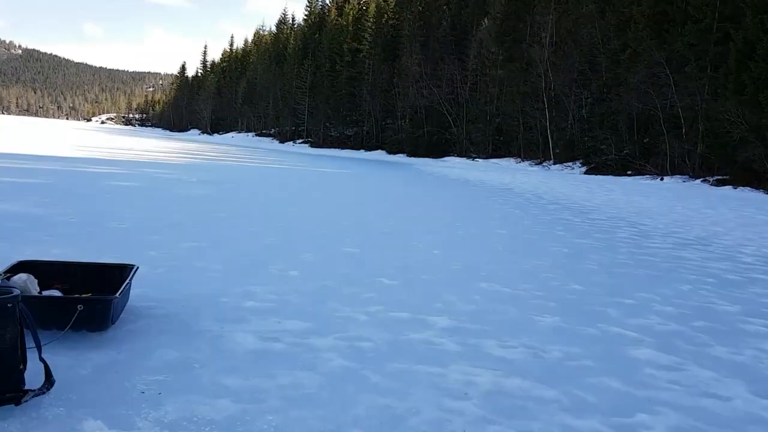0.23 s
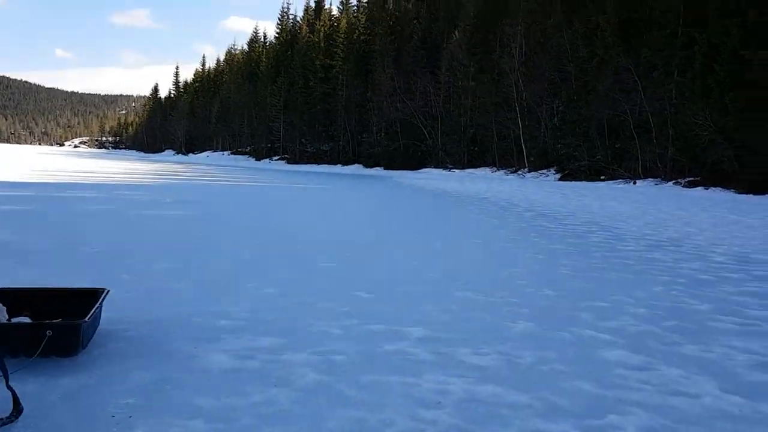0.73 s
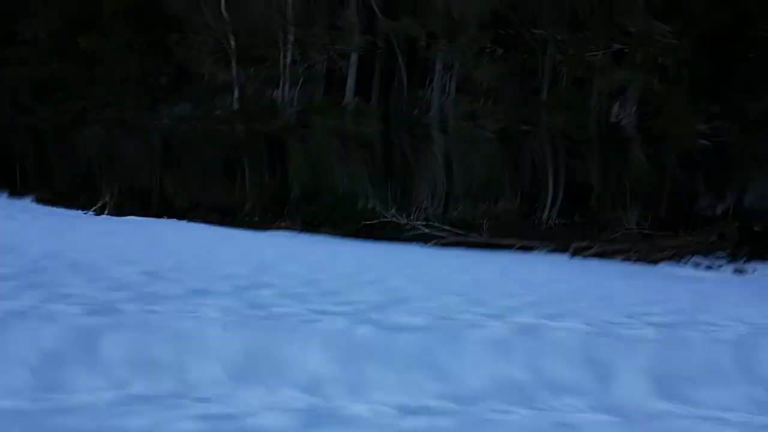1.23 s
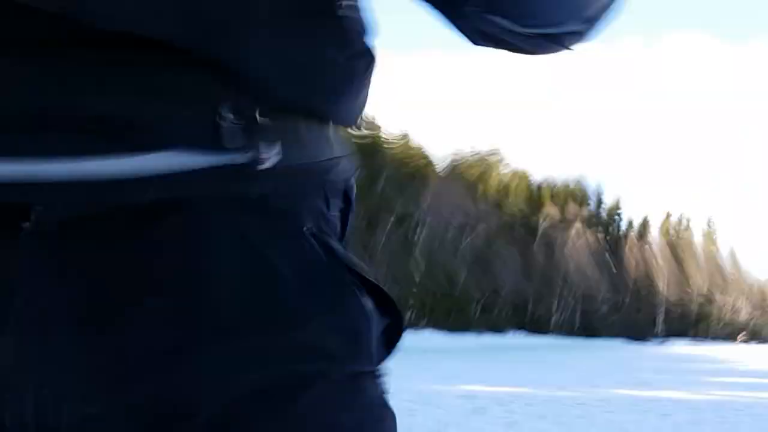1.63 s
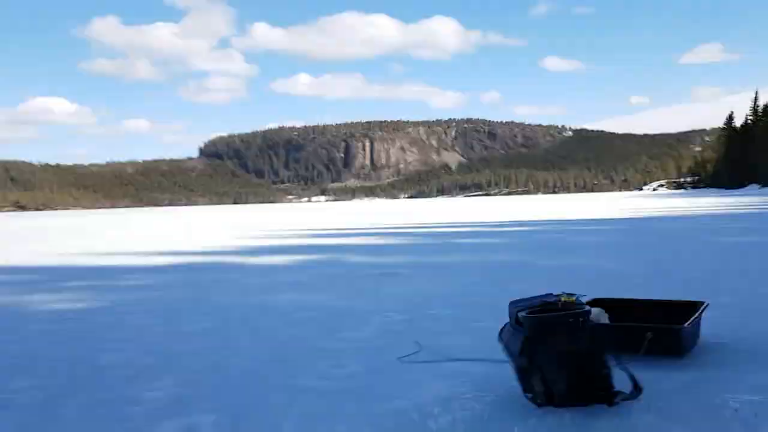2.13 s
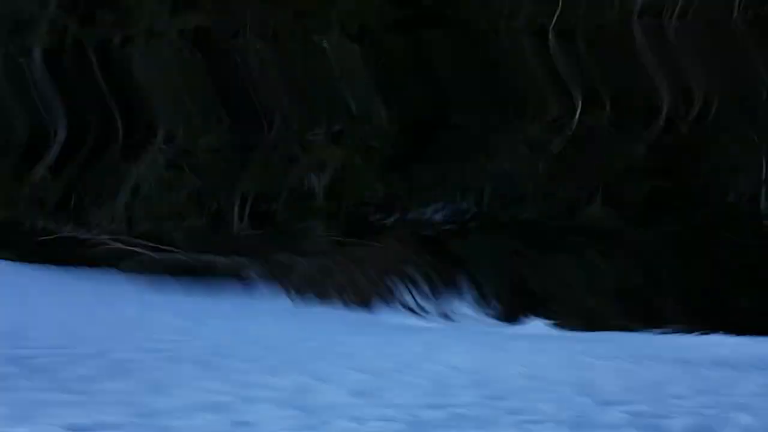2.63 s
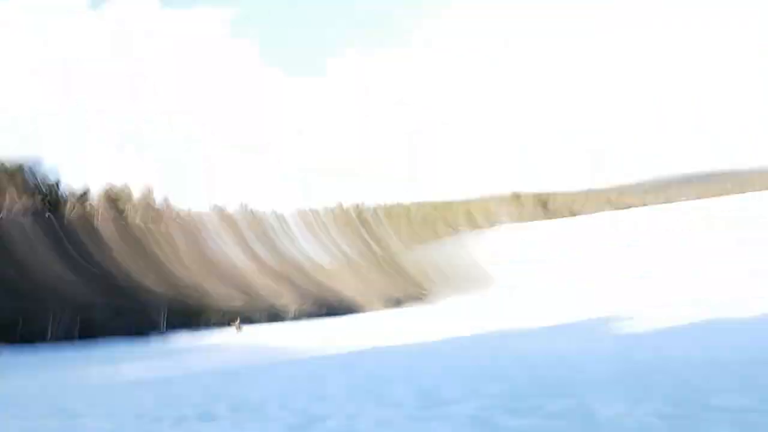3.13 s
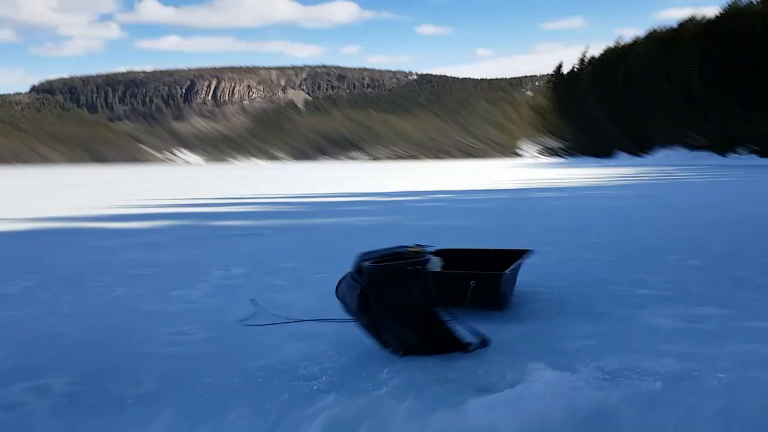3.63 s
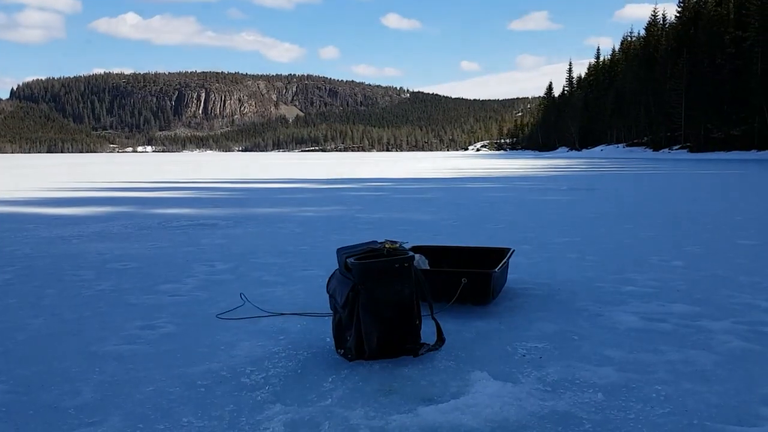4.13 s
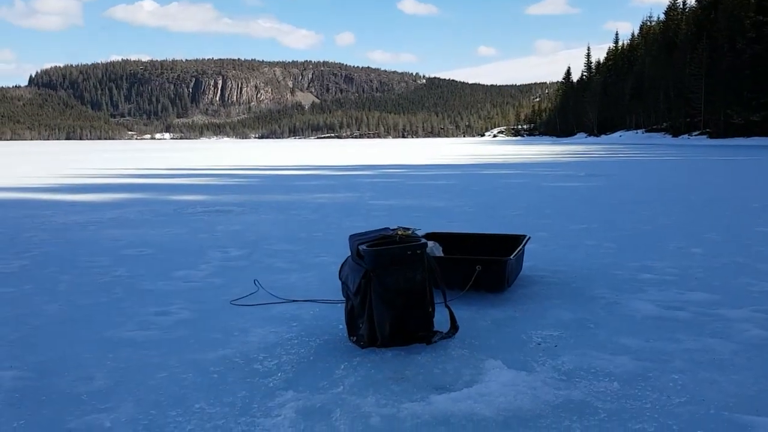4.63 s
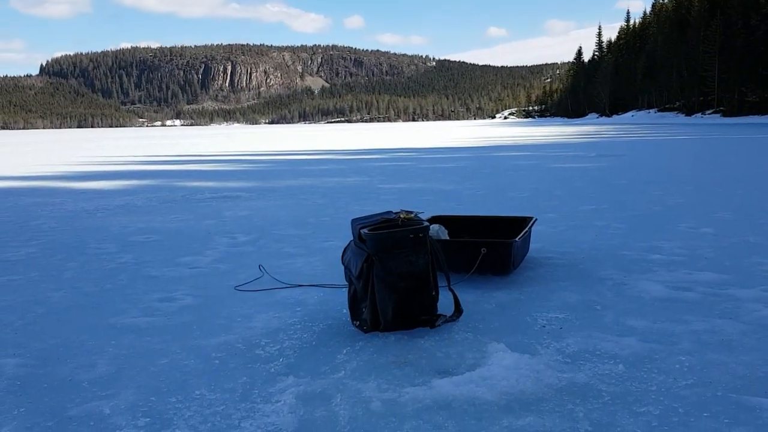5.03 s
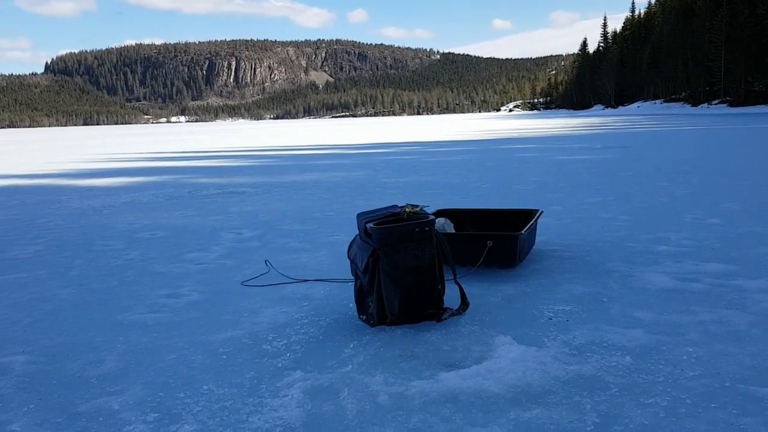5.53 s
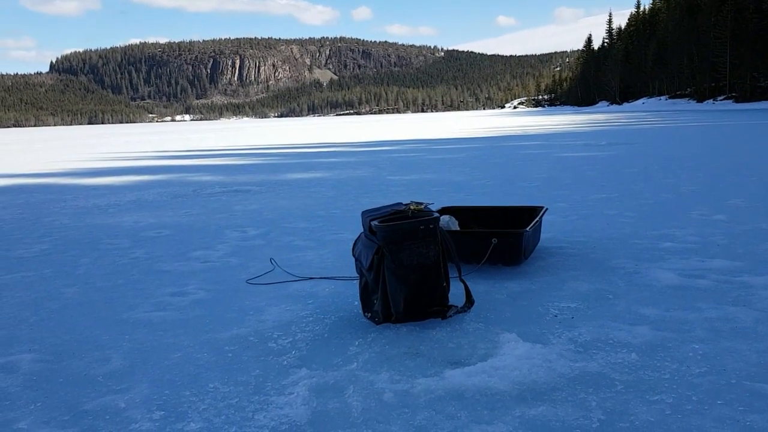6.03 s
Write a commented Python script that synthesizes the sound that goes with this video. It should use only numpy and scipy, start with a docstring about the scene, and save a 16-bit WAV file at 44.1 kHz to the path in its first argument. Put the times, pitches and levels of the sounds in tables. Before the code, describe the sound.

A hand auger bores into lake ice, heard very close from a microphone riding on it. Two quick catches and creaking, snapping boot crunches come first, then a light lull, jolting chatter with short squeals, and a steady rough grind with ticking ice chips. The grind stops abruptly, leaving crunching steps that thin out and return, over soft clothing rustle and a quiet, open, echoless lake.

```python
"""A hand auger turns into lake ice, with the camera and its two microphone ports riding on it.
Its blades catch, chatter and squeal, then grind: random breaks excite resonances and spectra.
Chips, as short noise bursts, tick close to the right port, powder hisses and the steel shaft rings faintly.
Near by, boots creak, snap and crunch on crusted snow before and after the grinding, made of pitched grains
and noise. Winter clothes crinkle softly, and filtered noise gives the hush of the still, open lake."""
import sys
import numpy as np
from scipy import signal
from scipy.fft import rfft, irfft, next_fast_len
from scipy.io import wavfile
from scipy.ndimage import uniform_filter1d, map_coordinates

SR = 44100
rng = np.random.default_rng(int(sys.argv[2]) if len(sys.argv) > 2 else 0)


def transcribe(u):
    """Save the signal u as a 16-bit wav file named by the first command-line argument.

    u: samples, shape (n,) or (channels, n), limited to [-1, 1]; the rate is SR.
    q: integer samples, one column per channel.
    """
    v = np.clip(np.atleast_2d(u).T, -1, 1)
    q = np.round(v * 32767).astype(np.int16)
    wavfile.write(sys.argv[1], SR, q)


N = 276948
SIZE = next_fast_len(N + SR, real=True)  # room for responses to ring out
FREQ = np.fft.rfftfreq(SIZE, 1 / SR)
TIME = np.arange(N) / SR

# Event levels are relative, ahead of each layer's own trim; spectra are relative too.
# Hush of the open lake. Each row: frequency in Hz, density in dB per Hz.
AIR_SPECTRUM = [(25, -22), (100, -8), (200, -12), (320, -0.5), (520, -16), (1300, -18.5), (3400, -35),
                (8000, -41), (16000, -31)]
# Spread of the hush over the two ports. Each row: frequency in Hz, side minus mid in dB.
AIR_WIDTH = [(60, -10), (300, -5), (3000, 4)]

# How much the winter clothes shift. Each row: time in seconds, level in dB.
CLOTHES = [(0, -52.5), (0.65, -48.5), (1.0, -45.5), (3.8, -49.5), (4.4, -48.5), (4.75, -56), (5.2, -64),
           (5.7, -52.5), (6.28, -48.5)]

# A boot twists on packed snow. Each row: start in seconds, length in seconds, level in dB.
TWISTS = [(0.298, 0.025, -37), (0.36, 0.036, -35), (0.405, 0.075, -31), (0.543, 0.0068, -39),
          (0.59, 0.02, -44.5)]
# A heel or sole presses into looser snow. Each row: start in seconds, length in seconds,
# crunch in dB, rustle in dB.
STEPS = [(3.993, 0.037, -40, -41), (4.087, 0.034, -38.5, -43), (4.207, 0.041, -40, -39.5),
         (4.3, 0.19, -58, -55), (4.505, 0.014, -44.5, -49), (5.03, 0.044, -61.5, -68),
         (5.33, 0.05, -54.5, -65), (5.428, 0.075, -48, -56), (5.62, 0.03, -49.5, -58),
         (5.823, 0.071, -40.5, -39.5), (5.928, 0.13, -36, -41), (6.198, 0.016, -34.5, -44),
         (6.265, 0.03, -34, -38)]
# Loudest snaps of the crust under a boot. Each row: start in seconds, pop level in dB, pitch in Hz,
# crispness (crack minus pop) in dB.
SNAPS = [(0.448, -8.5, 1350, -42), (0.455, -11.5, 1500, -35), (0.466, -17, 1270, -31),
         (0.525, -19, 1220, -25), (0.546, -24, 1090, -12.5), (0.609, -27, 1570, -20),
         (0.915, -24, 2000, -15.5), (3.824, -13, 1720, -25), (3.841, -30.5, 960, -12),
         (4.112, -28, 1170, -17), (4.207, -24.5, 1350, -13), (4.237, -24.5, 920, -14),
         (4.298, -29, 2700, -8), (4.331, -26.5, 1530, -28), (4.356, -23.5, 2540, -10.5),
         (4.417, -22, 2400, -13), (4.516, -17, 2970, -40), (4.897, -37.5, 1150, -20),
         (4.945, -34.5, 3050, -16.5), (5.031, -29.5, 3180, -14.5), (5.069, -44.5, 1270, -6),
         (5.326, -37.5, 2140, -11.5), (5.427, -30, 1190, -15.5), (5.481, -31, 920, -21),
         (5.626, -36, 784, -34), (5.823, -23.5, 1380, -21), (5.854, -17.5, 2110, -16),
         (5.881, -11.5, 3370, -19), (5.937, -32.5, 886, 5.5), (6.101, -28, 2300, -22),
         (6.169, -25, 870, -32), (6.204, -18.5, 1980, -14)]
# Fine crunch of packed snow. Each row: frequency in Hz, density in dB per Hz.
PACKED_SPECTRUM = [(47, -64), (80, -25.5), (431, -11), (629, -27), (1200, -11), (2040, -15), (3620, -26.5),
                   (5400, -26), (8990, -33), (14600, -38.5), (16000, -44)]
# Crunch of looser snow. Each row: frequency in Hz, density in dB per Hz.
CRUNCH_SPECTRUM = [(40, -14), (150, -6), (350, 6.5), (1000, -5.5), (2400, -14), (4000, -8), (9000, -18.5)]
# Rustle of powder and clothing, also the crack of the crust. Each row: frequency in Hz, density in dB per Hz.
RUSTLE_SPECTRUM = [(800, -23), (2400, 7), (3500, 1.5), (5700, -1.5), (8500, -5.5), (16000, -18)]
# What the air path passes on from a single break. Each row: frequency in Hz, gain in dB.
AIR_PATH = [(40, -33), (300, -9), (700, 1), (5000, -4), (9000, -8), (16000, -18.5)]
# Spread of the twists and pops over the ports. Each row: frequency in Hz, side minus mid in dB.
NEAR_WIDTH = [(60, -5), (150, -4.5), (380, -13), (950, -23), (2380, -6.5), (5980, -3), (15000, 8)]
# Spread of the steps, cracks and clothes over the ports. Each row: frequency in Hz, side minus mid in dB.
STEP_WIDTH = [(60, -4), (150, -12), (380, -14), (950, -5), (2380, -3.5), (5980, 2.5), (15000, -2)]
# Balance of boots and clothes. Each row: frequency in Hz, left minus right in dB.
STEP_LEAN = [(500, 0.5), (3500, 1.2), (7000, 6)]

# Largest flying chips of ice. Each row: time in seconds, peak in dB.
CHIPS = [(0.6564, -25), (0.9825, -23), (1.013, -20), (1.115, -16), (1.2365, -17), (1.2745, -14),
         (1.541, -18), (2.2862, -11.5), (2.4089, -17.5), (2.5282, -12), (2.5681, -10.5), (2.6574, -9.5),
         (2.6853, -12.5), (2.8145, -18.5), (2.9158, -13), (2.9417, -13.5), (3.2884, -13), (3.3687, -13.5),
         (3.6167, -11.5), (3.709, -20), (4.5715, -23), (5.3527, -27.5), (5.4819, -17.5), (5.5019, -25)]
# Tick of a chip near the port. Each row: frequency in Hz, density in dB per Hz.
TICK_SPECTRUM = [(1000, -25), (2500, -6.5), (4000, 6.5), (8000, 4), (16000, 0)]
# Hiss of the ice powder. Each row: frequency in Hz, density in dB per Hz.
SPRAY_SPECTRUM = [(1000, -25), (3500, 10), (8000, 1), (12000, -9), (16000, -4)]
# A blade squeals over the ice. Each row: start in seconds, length in seconds, start pitch in Hz,
# end pitch in Hz, level in dB.
SQUEALS = [(1.23, 0.027, 1750, 1500, -23.5), (1.268, 0.036, 1370, 1060, -40),
           (1.34, 0.025, 3330, 2290, -28), (1.643, 0.029, 951, 880, -15), (1.857, 0.013, 1980, 1770, -21.5)]

# The blades catch in the ice. Each row: start in seconds, length in seconds, chatter in dB,
# shaving in dB, rumble in dB.
BITES = [(0.011, 0.022, -17.5, -27, -28), (0.039, 0.025, -25, -31.5, -28.5), (1.05, 0.055, -21, -35, -31),
         (1.134, 0.14, -21, -31, -31), (1.184, 0.13, -22.5, -30, -23.5), (1.34, 0.019, -21.5, -26, -31),
         (1.587, 0.096, -23.5, -36.5, -24.5), (1.697, 0.022, -23, -39.5, -28),
         (1.824, 0.0063, -26.5, -41, -32), (1.841, 0.095, -34, -31.5, -25),
         (1.902, 0.017, -20.5, -26.5, -30)]
# The blades slide without catching. Each row: start in seconds, length in seconds, rumble in dB, shaving in dB.
SLIDES = [(0.68, 0.13, -42.5, -56), (0.98, 0.06, -37.5, -45), (1.37, 0.19, -30.5, -39.5),
          (1.72, 0.1, -27.5, -62), (1.93, 0.066, -28, -45), (4.51, 0.17, -51.5, -59),
          (4.72, 0.29, -60.5, -65)]
# Pressure on the seated blades. Each row: time in seconds, level in dB.
GRIND = [(2.06, -42), (2.088, -27), (2.27, -19), (2.826, -18), (3.004, -20.5), (3.556, -18), (3.66, -21),
         (3.706, -25.5), (3.74, -57)]
# Chunks of ice break under a blade. Each row: time in seconds, peak in dB.
JOLTS = [(0.018, -4.5), (0.028, -5), (0.947, -21), (0.974, -20), (1.053, -15), (1.072, -17.5), (1.185, -16),
         (1.222, -4), (1.265, -7.5), (1.291, -5.5), (1.583, -11), (1.618, -9), (1.66, -16.5), (1.693, -9),
         (1.821, -7.5), (1.842, -4.5), (1.9, -10.5), (2.084, -14)]
# Resonances of the auger. Each row: frequency in Hz, width in Hz, level in dB.
AUGER_MODES = [(388, 40.5, 3), (636.7, 31.6, 0), (855, 76, -2), (989, 48, -2), (1090, 77, -6),
               (1616, 18, -9.5), (1874, 20, -24), (2495, 48, -10), (3285, 96, -17.5), (4380, 27, -24.5),
               (4900, 30, -39)]
# Resonances of the blades. Each row: frequency in Hz, width in Hz, level in dB.
BLADE_MODES = [(1770, 57, 2), (1900, 11, 4.5), (2502, 77, 4.5), (3750, 660, -7.5), (4400, 110, -17.5)]
# Lasting modes of the steel shaft. Each row: frequency in Hz, level in dB, time to die by 60 dB in seconds.
SHAFT_MODES = [(479, -42, .5), (1930, -36, .3), (2390, -37, 1.3), (2480, -34, .4)]
# Rumble of the grinding auger. Each row: frequency in Hz, density in dB per Hz.
GRINDING_SPECTRUM = [(24, -56.5), (40, -29.5), (104, -17), (155, -9), (226, -9), (297, 1), (412, 3.5),
                     (663, -10.5), (852, -10), (1410, -26.5), (2440, -29.5), (3060, -33), (3740, -38),
                     (5870, -46), (16000, -70)]
# Hiss of ice shavings. Each row: frequency in Hz, density in dB per Hz.
SHAVING_SPECTRUM = [(40, -13.5), (150, -7), (1000, -9), (1800, -5.5), (3400, -11), (5000, -15),
                    (8500, -23.5), (16000, -30)]
# What the auger's body passes on. Each row: frequency in Hz, relative gain in dB.
BODY_PATH = [(40, -17), (150, -0.5), (4500, 5.5), (8000, -7), (16000, -20)]
# Spread of the rumble over the ports. Each row: frequency in Hz, side minus mid in dB.
AUGER_WIDTH = [(60, 20), (95, -2), (150, 11.5), (240, 1.5), (380, -11.5), (600, -11.5), (950, -4),
               (1500, 6.5), (2380, -4.5), (3770, -5), (5980, 2), (9470, 4), (15000, 22.5)]
# Spread of bites, grit and powder over the ports. Each row: frequency in Hz, side minus mid in dB.
BITE_WIDTH = [(110, 1), (200, 11), (380, -0.5), (650, -10), (1290, 2.5), (2380, -2), (3800, -5.5),
              (7000, 0.5)]
# Balance of the auger's sounds. Each row: frequency in Hz, left minus right in dB.
AUGER_LEAN = [(60, 0.5), (200, 7.5), (380, -1), (700, 1.5), (1800, 3.5), (4500, 2.5)]

# The duller left microphone port. Each row: frequency in Hz, gain in dB.
LEFT_PORT = [(5000, -0.5), (6500, -4.5), (9000, -16.5), (11000, -9.5), (16000, -10)]
TOP_HZ = 16000  # band limit of the camera

# Rise and fall are the times to swell and to die by 60 dB.
TWIST_RISE_S, TWIST_FALL_S = 0.081, 0.12
TWIST_SWELL_DB = 0.5  # the creak grows as the weight comes on
STEP_RISE_S, STEP_FALL_S = 0.013, 0.023
# The snow also yields softly before and after each press.
SETTLE_DB, SETTLE_RISE_S, SETTLE_FALL_S = -7, 0.4, 0.55
# Smaller chips: mean rate, peak over the pressure, scatter.
CRUMBS_PER_S, CRUMB_DB, CRUMB_SPREAD_DB = 14, -4, 5
SPRAY_START_S, SPRAY_LENGTH_S, SPRAY_DB = 1.19, 0.22, -44
SPRAY_RISE_S, SPRAY_FALL_S = 0.9, 0.6
BITE_RISE_S, BITE_FALL_S = 0.086, 0.065
BITE_SAG_DB = 2  # a bite weakens from its start to its end
SLIDE_RISE_S, SLIDE_FALL_S = 0.075, 0.35
# Uneven ice makes the rumble and the grit swell at random.
SURGES_PER_S, SURGE_DB, GRIT_SURGE_DB = 14, 0.5, 4.5


def amp(db):
    """Decibels to gain."""
    return 10 ** (np.asarray(db) / 20)


def unit(x):
    """Scale to rms 1."""
    return x / np.sqrt(np.mean(np.abs(x) ** 2))


def along(points):
    """(Hz, value) points joined on a log axis, for every frequency."""
    hz, value = np.transpose(points)
    return np.interp(np.log(FREQ + 1), np.log(hz + 1), value)


def level(curve):
    """Gain per sample from (s, dB) points; silent outside them."""
    s, db = np.transpose(curve)
    return amp(np.interp(TIME, s, db, left=-np.inf, right=-np.inf))


def colour(points):
    """Causal (minimum-phase) response of unit power with the given spectrum."""
    cepstrum = irfft(np.log(amp(along(points))), SIZE)
    cepstrum[1:SIZE // 2] *= 2
    cepstrum[SIZE // 2 + 1:] = 0
    return unit(np.exp(rfft(cepstrum)))


def resonances(modes):
    """Causal response of unit power of damped modes, of alternating sign."""
    total = 0
    for k, (hz, width, db) in enumerate(modes):
        damping = 1j * FREQ * width
        total = total + (-1) ** k * amp(db) * damping / (hz * hz - FREQ ** 2 + damping)
    return unit(total)


def response_peak(response):
    """Highest point of the sound of a single unit impulse."""
    return np.abs(irfft(response, SIZE)).max()


def scattered(force):
    """(mid, side) of impulses that each lead at one port or the other, at random, with equal level at both."""
    return np.array([force, force * rng.choice([-1, 1], N)])


def evened(pair, even_s):
    """Keep the power of a run of breaks near 1 over even_s."""
    power = np.abs(uniform_filter1d(pair[0] ** 2, max(int(even_s * SR), 1)))
    return pair / np.sqrt(power + np.mean(power) / 100)


def fractures(rate, spread_db, even_s):
    """Tiny breaks at random moments and of uneven size, rate a second."""
    breaks = rng.random(N) < rate / SR
    size = amp(spread_db * rng.standard_normal(N))
    return evened(scattered(breaks * size * rng.choice([-1, 1], N)), even_s)


def grains(count, hz, octaves, cycles, spread_db, even_s):
    """Coarse breaks as (mid, side): each rings for a few cycles at a pitch of its own."""
    start, side = rng.random((count, 2)).T[..., None]
    pitch, size, sign = rng.standard_normal((count, 3)).T[..., None]
    steps = np.arange(SR // 80)
    turns = np.minimum(hz * 2 ** (octaves * pitch), SR / 4) * steps / SR
    # a break swells over its first cycle while it dies away
    envelope = amp(spread_db * size - 60 * turns / cycles) * np.minimum(turns, 1)
    rings = np.sign(sign) * envelope * np.sin(2 * np.pi * turns)
    where = ((start * N).astype(int) + steps).ravel()
    sided = rings * np.sign(side - .5)
    pair = np.array([np.bincount(where, r.ravel(), N)[:N] for r in (rings, sided)])
    return evened(pair, even_s)


def blows(rows, response, late_s):
    """Single impulses, late_s after their row times, scaled to reach their peaks through a response."""
    s, db = np.transpose(rows)
    where = np.clip((s + late_s) * SR, 0, N - 1).astype(int)
    return scattered(np.bincount(where, amp(db), N)) / response_peak(response)


def stroke(start, length, rise_s, fall_s, swell_db=0):
    """Gain of one push: it rises, holds while drifting by swell_db, and dies away."""
    t = TIME - start
    outside = np.maximum(-t, 0) / rise_s + np.maximum(t - length, 0) / fall_s
    drift_db = swell_db * (np.clip(t / length, 0, 1) - 1.0)
    return amp(drift_db - 60 * outside)


def strokes(rows, rise_s, fall_s, swell_db=0):
    """One gain curve for each dB column of (start, length, dB, ..) rows; the strongest push prevails."""
    pushes = []
    for start, length, *dbs in rows:
        pushes.append(np.outer(amp(dbs), stroke(start, length, rise_s, fall_s, swell_db)))
    return np.max(pushes, axis=0)


def wobble(rate):
    """A smooth random curve, rate knots a second."""
    return map_coordinates(rng.standard_normal(400), [TIME * rate], mode="wrap")


def heard(pair, response, width, lean):
    """(mid, side) through a response to the two ports, the side turned by a quarter cycle."""
    mid, side = rfft(pair, SIZE)
    side = 1j * side * amp(along(width))
    tilt = amp(along(lean) / 2)
    ports = np.array([(mid + side) * tilt, (mid - side) / tilt])
    return irfft(ports * response, SIZE)[:, :N]


def air():
    """The faint hush of the open lake: steady noise with a fixed spectrum."""
    hush = amp(-66.5) * rng.standard_normal((2, N))
    return heard(hush, colour(AIR_SPECTRUM), AIR_WIDTH, lean=[(1000, 0)])


def clothing():
    """Stiff fabric crinkles softly in tiny random breaks as the body moves."""
    crinkle = level(CLOTHES) * fractures(rate=5500, spread_db=8.5, even_s=0.37)
    fabric = colour([(100, -3), (500, 8.0), (2500, -7), (6000, -15), (9000, -18), (16000, -18.5)])
    return heard(crinkle, fabric, STEP_WIDTH, STEP_LEAN)


def twisting():
    """Packed snow gives way in short creaking grains over a finer crunch."""
    creak = amp(-1.0) * grains(count=4500, hz=1300, octaves=.4, cycles=7, spread_db=5, even_s=.04)
    fine = amp(-3.5) * fractures(rate=4500, spread_db=5.0, even_s=.05)
    sound = heard(creak, amp(along(AIR_PATH)), NEAR_WIDTH, STEP_LEAN)
    sound = sound + heard(fine, colour(PACKED_SPECTRUM), NEAR_WIDTH, STEP_LEAN)
    return strokes(TWISTS, TWIST_RISE_S, TWIST_FALL_S, TWIST_SWELL_DB) * sound


def stepping():
    """Clumps collapse under the soles and crust crackles, while powder and clothing rustle."""
    settling = amp(SETTLE_DB) * strokes(STEPS, SETTLE_RISE_S, SETTLE_FALL_S)
    weight, brush = np.maximum(strokes(STEPS, STEP_RISE_S, STEP_FALL_S), settling)
    clods = grains(count=3500, hz=1134, octaves=0.62, cycles=7.4, spread_db=5.0, even_s=0.045)
    clumps = amp(-2.0) * weight * clods
    crust = brush * grains(count=5000, hz=3000, octaves=.5, cycles=6, spread_db=5, even_s=.06)
    crunch = amp(-5.0) * weight * fractures(rate=1900, spread_db=6.0, even_s=0.11)
    rustle = amp(-5) * brush * fractures(rate=9600, spread_db=10.0, even_s=.04)
    layers = [(clumps + crust, amp(along(AIR_PATH))),
              (crunch, colour(CRUNCH_SPECTRUM)),
              (rustle, colour(RUSTLE_SPECTRUM))]
    return sum(heard(force, response, STEP_WIDTH, STEP_LEAN) for force, response in layers)


def snapping(cycles=9, rise_s=.0001, crack_t60=.011, crumble_t60=.06):
    """The crust snaps: a pop that dies by 60 dB over a few cycles, a crisp noise crack, then crumbs."""
    t = TIME[:SR // 20]
    pops, cracks = np.zeros((2, N + SR))
    for s, db, hz, crisp_db in SNAPS:
        start = round((s + .0007) * SR)
        pop_envelope = amp(db + 4.5 - 60 * t * hz / cycles) * (1 - np.exp(-t / rise_s))
        pops[start:][:len(t)] += pop_envelope * np.sin(2 * np.pi * hz * t)
        crumbs = amp(4 - 60 * t / crumble_t60) * (rng.random(len(t)) < .12)
        crack_envelope = amp(db + crisp_db) * (amp(-60 * t / crack_t60) + crumbs)
        cracks[start:][:len(t)] += crack_envelope * rng.standard_normal(len(t))
    popped = heard(np.outer([1, 1], pops[:N]), amp(along(AIR_PATH)), NEAR_WIDTH, STEP_LEAN)
    return popped + heard(scattered(cracks[:N]), colour(RUSTLE_SPECTRUM), STEP_WIDTH, STEP_LEAN)


def chips(shatter_t60=0.0049):
    """Ice chips shatter as noise bursts close to the right port; grinding adds smaller random crumbs."""
    tick = colour(TICK_SPECTRUM)
    moments = rng.random(N) < CRUMBS_PER_S / SR
    crumbs = moments * level(GRIND) * amp(CRUMB_DB + CRUMB_SPREAD_DB * rng.standard_normal(N))
    hits = blows(CHIPS, tick, late_s=0.00064)[0] + crumbs / response_peak(tick)
    decay = amp(-60 * TIME[:SR // 50] / shatter_t60)
    shatter = signal.fftconvolve(hits, decay)[:N]
    bursts = amp(-14) * scattered(shatter * rng.standard_normal(N))
    return heard(bursts, tick, width=[(4000, -9)], lean=[(2500, -24.0), (8000, -1.5)])


def spraying():
    """Powder thrown up by the blades hisses as many tiny impacts that swell and die away."""
    cloud = amp(SPRAY_DB) * stroke(SPRAY_START_S, SPRAY_LENGTH_S, SPRAY_RISE_S, SPRAY_FALL_S)
    powder = cloud * fractures(rate=7800, spread_db=13, even_s=.05)
    return heard(powder, colour(SPRAY_SPECTRUM), BITE_WIDTH, AUGER_LEAN)


def squealing(rough=0.35):
    """Brief falling squeals, rough with stick and slip; rough is the phase flutter in radians rms."""
    sound = np.zeros(N)
    flutter = unit(uniform_filter1d(rng.standard_normal(N), SR // 500))
    for s, length, start_hz, end_hz, db in SQUEALS:
        progress = np.clip((TIME - s) / length, 0, 1)
        phase = 2 * np.pi * np.cumsum(start_hz + (end_hz - start_hz) * progress) / SR
        sound += amp(db) * np.sin(np.pi * progress) * np.sin(phase + rough * flutter)
    return sound * amp([[1], [-1]])  # left 2 dB over right


def slipping(stick_s=0.0052, depth=0.45, surge=0.35):
    """The blade sticks and grows quieter before each chunk breaks, then lurches on."""
    since = [TIME - s for s, db in JOLTS]
    stuck = sum(np.exp(-((t + stick_s / 2) / stick_s) ** 2) * (t < 0) for t in since)
    lurch = sum(np.exp(-np.abs(t) / stick_s) * (t >= 0) for t in since)
    return 1 - np.clip(depth * stuck, 0, 1) + surge * lurch


def blade_work():
    """How hard the blades chatter, shave and rub as they bite, slide and finally grind."""
    catch, bite_cut, bite_rub = strokes(BITES, BITE_RISE_S, BITE_FALL_S, swell_db=-BITE_SAG_DB)
    slide_rub, slide_cut = strokes(SLIDES, SLIDE_RISE_S, SLIDE_FALL_S)
    cutting = np.hypot(bite_cut, slide_cut)
    contact = np.hypot(bite_rub, slide_rub) + amp(1) * level(GRIND)
    return slipping() * np.array([catch, cutting, contact])


def grinding(contact):
    """In contact, the blades shave densely and the auger rumbles; grit rasps on the ringing blades."""
    rumble_gain = amp(-1.0 + SURGE_DB * wobble(SURGES_PER_S))
    rumble = rumble_gain * contact * fractures(rate=2000, spread_db=2, even_s=0.03)
    grit_gain = amp(-26.5 + GRIT_SURGE_DB * wobble(SURGES_PER_S))
    grit = grit_gain * contact * fractures(rate=650, spread_db=5.0, even_s=.08)
    rasp = unit(resonances(BLADE_MODES) * colour(BODY_PATH))
    rumbling = heard(rumble, colour(GRINDING_SPECTRUM), AUGER_WIDTH, AUGER_LEAN)
    return rumbling + heard(grit, rasp, BITE_WIDTH, AUGER_LEAN)


def biting(catch, cutting):
    """The blades catch and skip: chunks shake the auger, splinters crackle, shavings hiss."""
    body = unit(resonances(AUGER_MODES) * colour(BODY_PATH))
    chunks = grains(count=2200, hz=873, octaves=0.7, cycles=9.6, spread_db=5.5, even_s=0.0225)
    chatter = amp(-11) * catch * chunks + amp(-6) * blows(JOLTS, body, late_s=.002)
    slivers = grains(count=3400, hz=2086, octaves=0.51, cycles=19, spread_db=7.5, even_s=0.029)
    splinters = amp(-1.5) * cutting * slivers
    shavings = amp(-4.5) * cutting * fractures(rate=5000, spread_db=3, even_s=.02)
    layers = [(chatter + amp(5.0) * shavings, body),  # shaving shakes the auger too
              (splinters, amp(along(AIR_PATH))),
              (shavings, colour(SHAVING_SPECTRUM))]
    return sum(heard(force, response, BITE_WIDTH, AUGER_LEAN) for force, response in layers)


def shaft_ring(x):
    """The steel shaft sings on in decaying modes after the blades have shaken it."""
    t = TIME[:SR]
    ring = sum(amp(db - 60 * t / t60) * np.sin(2 * np.pi * hz * t) for hz, db, t60 in SHAFT_MODES)
    return amp(-30) * signal.fftconvolve(x, ring[None], axes=1)[:, :N]


def scene():
    """Air, clothes, boots and auger; the open ice gives no echo."""
    background = air() + clothing()
    boots = twisting() + stepping() + snapping()
    catch, cutting, contact = blade_work()
    auger = grinding(contact) + biting(catch, cutting)
    return background + boots + chips() + spraying() + squealing() + auger + shaft_ring(auger)


def record(dry):
    """The camera rounds off the highest peaks, its left port is dull, and nothing passes its band limit."""
    held = dry / (1 + np.abs(dry / .95) ** 6) ** (1 / 6)
    ports = np.array([amp(along(LEFT_PORT)), np.ones_like(FREQ)])
    return irfft(rfft(held, SIZE) * ports * (FREQ < TOP_HZ), SIZE)[:, :N]


dry = scene()
out = record(dry)
transcribe(out)
```